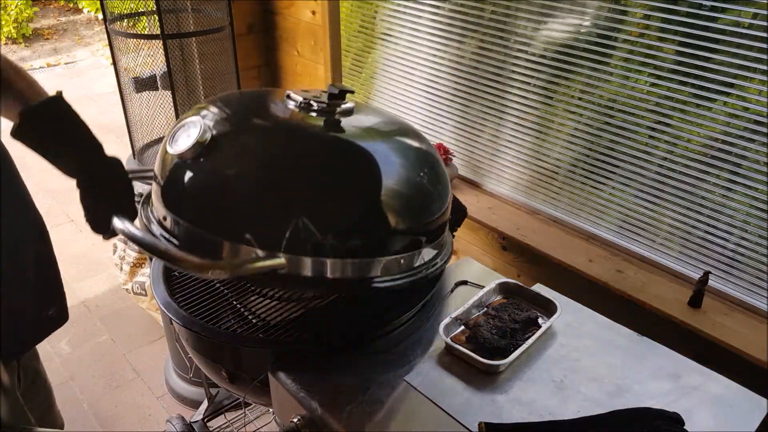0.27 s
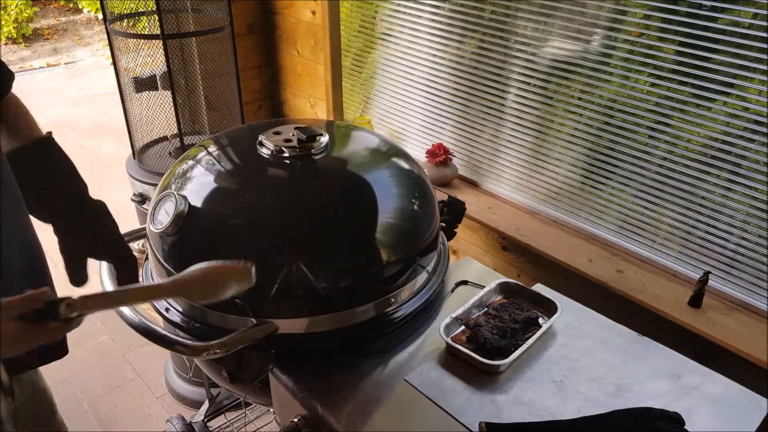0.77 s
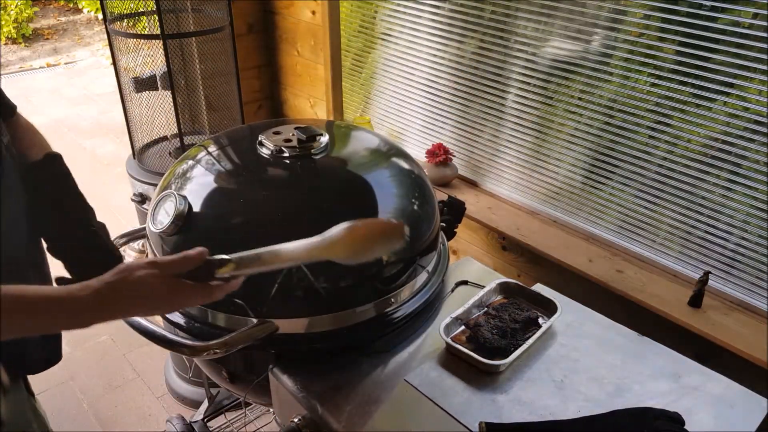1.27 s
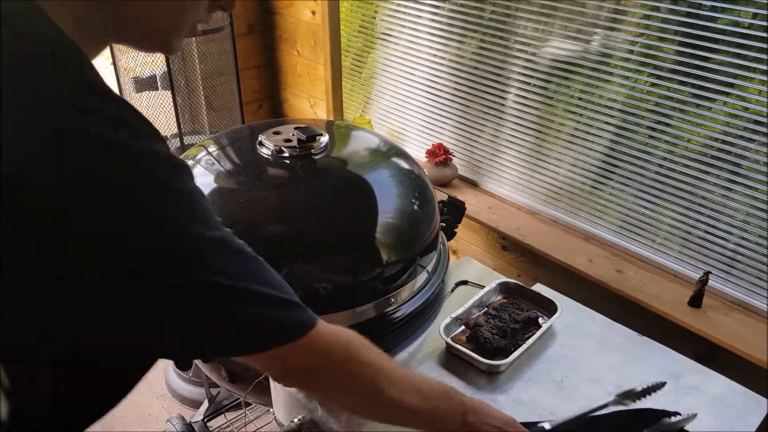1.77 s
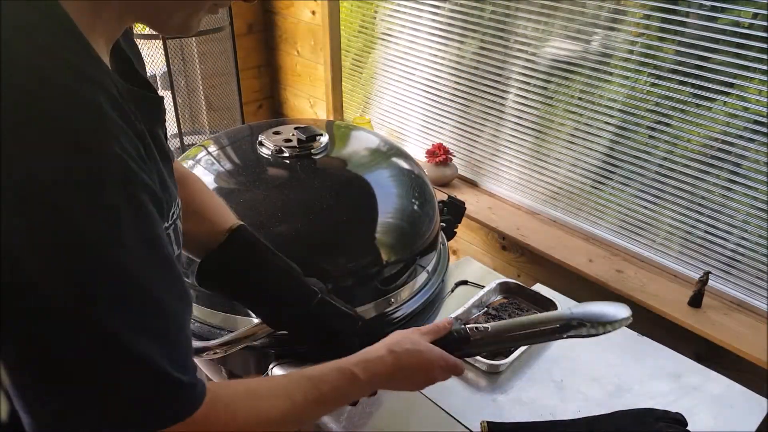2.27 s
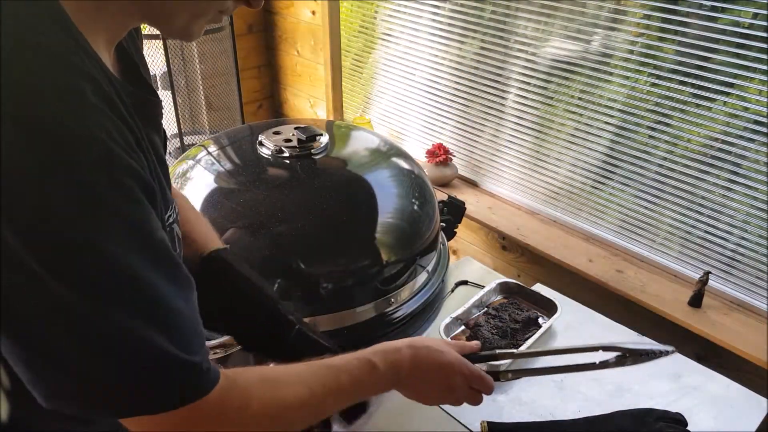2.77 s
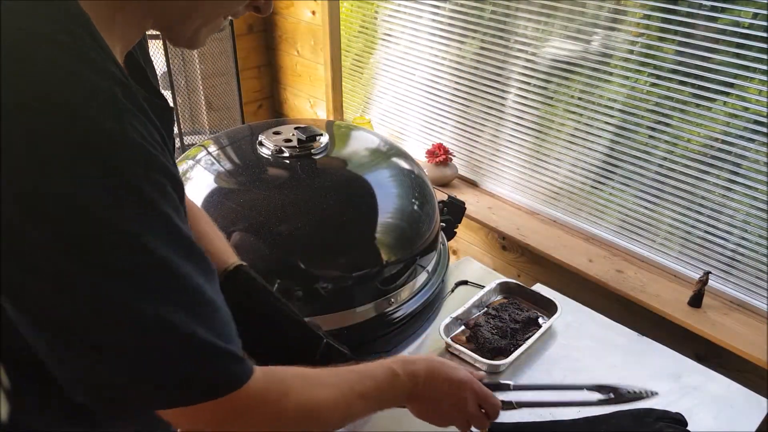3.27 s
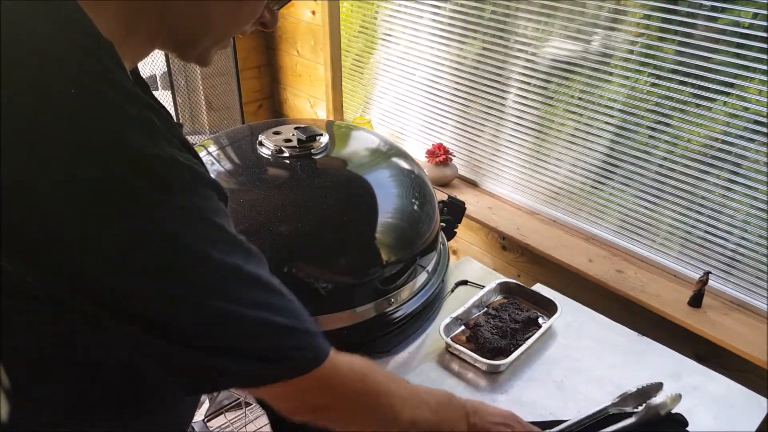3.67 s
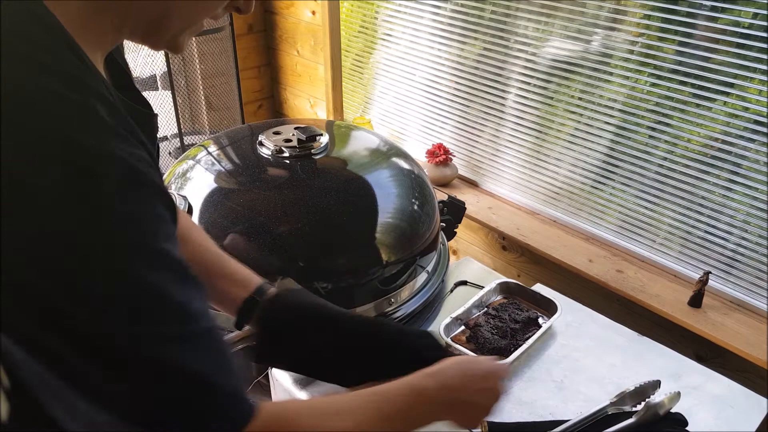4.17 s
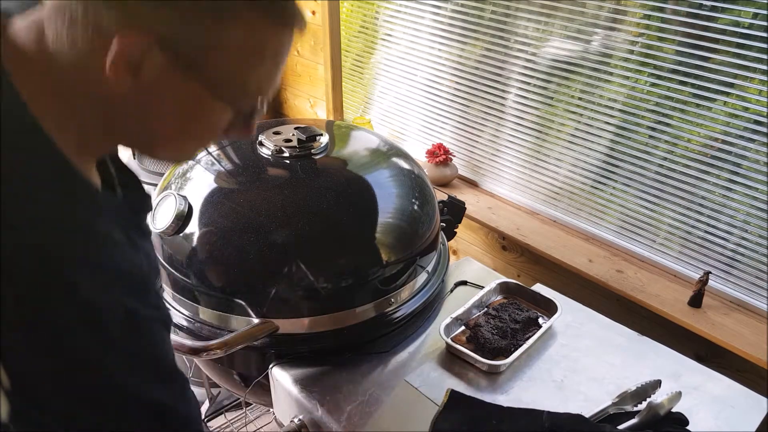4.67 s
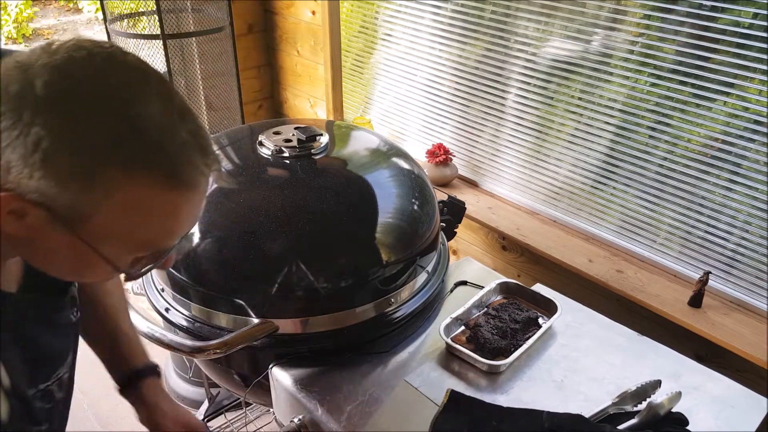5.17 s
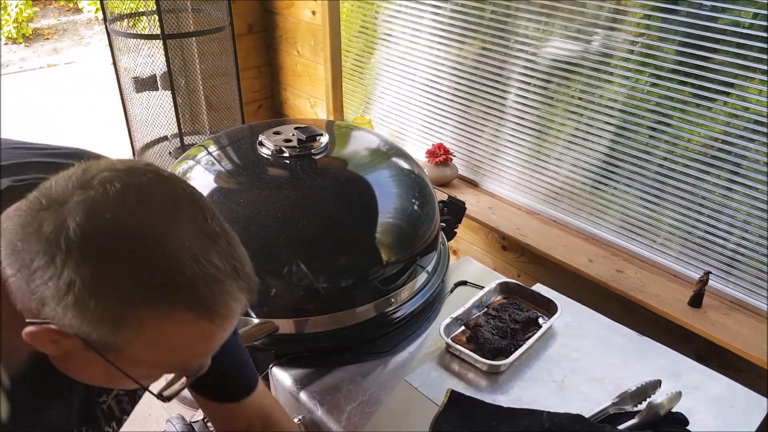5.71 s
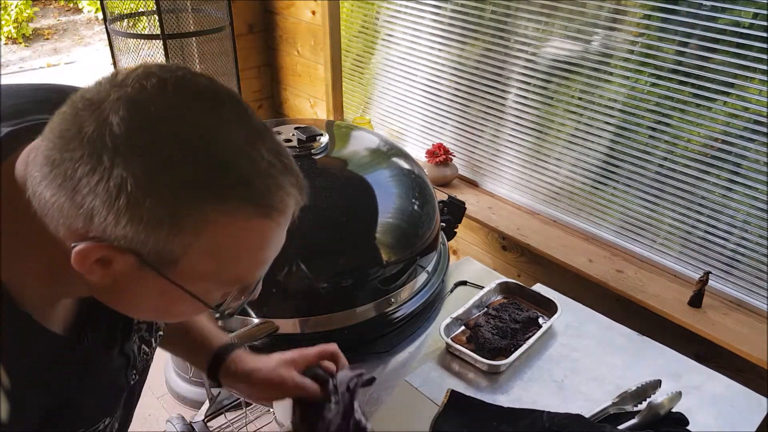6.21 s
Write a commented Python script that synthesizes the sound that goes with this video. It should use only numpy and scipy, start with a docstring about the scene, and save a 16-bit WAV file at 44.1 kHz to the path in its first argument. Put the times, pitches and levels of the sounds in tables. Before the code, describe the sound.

In a small wooden shelter, a steel lid's hinge gives a brief falling squeal with dry rubbing, then the lid seats softly with a short ring. Tongs click and chatter before being dropped with a loud, bright clack on a booming steel table. A glove lands softly, then gritty rummaging comes in bursts. Close stereo pickup, slightly right, with soft air and a faint distant bird.

```python
"""In a small wooden barbecue shelter a hinged steel kettle lid squeals down and seats on its bowl: stick-slip
overtones amid dry rubbing, a glove on the handle, a short ringing dome. Steel tongs chatter as tiny touches
through ringing arms and drop on the sheet-steel side table, whose modes boom; a glove is laid beside them.
Below the table, showers of small catches make gritty rummaging. Close walls answer nearly every sound; a far
bird whistles over soft air."""
import sys
import numpy as np
from scipy import signal
from scipy.fft import rfft, irfft, next_fast_len
from scipy.io import wavfile
from scipy.ndimage import map_coordinates

SR = 44100
rng = np.random.default_rng(int(sys.argv[2]) if len(sys.argv) > 2 else 0)


def materialize(psi):
    """Save the field psi as 16-bit PCM at rate SR to the path in sys.argv[1].

    A 1-D psi becomes a single channel; in a 2-D psi each row is a channel.
    """
    bounded = np.clip(np.atleast_2d(psi).T, -1, 1)
    quanta = np.round(bounded * 32767).astype(np.int16)
    wavfile.write(sys.argv[1], SR, quanta)


N = 284312

TOP_HZ = 16100  # upper band limit
T = np.arange(int(.7 * SR)) / SR  # time axis of one sound, in seconds


def amp(db):
    """Decibels to gain."""
    return 10 ** (np.asarray(db) / 20)


def unit(x):
    """Scale to rms 1."""
    return x / np.sqrt(np.mean(x ** 2) + 1e-20)


def burst(x, seconds):
    """Scale to the energy of rms 1 held for so many seconds."""
    energy = np.sum(np.atleast_2d(x) ** 2, 1).mean()
    return x / np.sqrt(energy / (seconds * SR) + 1e-20)


def along(points, hz):
    """Read a curve of (Hz, value) points on a log frequency axis."""
    f, v = np.transpose(points)
    return np.interp(np.log(hz + 1), np.log(f + 1), v)


def wobble(rate, size):
    """A smooth random curve with rate knots a second."""
    knots = rng.standard_normal(int(size * rate / SR) + 4)
    return map_coordinates(knots, [np.arange(size) * rate / SR])


def swell(t, middle, half):
    """A smooth rise and fall around a moment."""
    return np.cos(np.pi / 2 * np.clip((t - middle) / half, -1, 1))


def add(track, s, sound):
    """Mix a sound into the track at time s."""
    start = max(round(s * SR), 0)
    track[:, start:start + sound.shape[-1]] += sound[..., :N - start]


def colour(x, spectrum, modes=(), ring_db=0):
    """Causal filter: a broad spectrum with (Hz, width in Hz, dB) resonances standing out of it."""
    size = next_fast_len(x.shape[-1] // 2 + 2048) * 2
    hz = np.fft.rfftfreq(size, 1 / SR)
    peaks = sum(amp(db + ring_db) ** 2 / (1 + (2 * (hz - f) / width) ** 2) for f, width, db in modes)
    gain = amp(along(spectrum, hz)) * np.sqrt(1 + peaks)
    # folding the cepstrum forward gives minimum phase
    cepstrum = irfft(np.log(np.maximum(gain, 1e-6)))
    cepstrum[1:size // 2] *= 2
    cepstrum[size // 2 + 1:] = 0
    return irfft(rfft(x, size) * np.exp(rfft(cepstrum)), size)[..., :x.shape[-1]]


def diffuse(size):
    """Stereo noise from all around: alike in the bass, unrelated in the treble."""
    # Each row: frequency in Hz, left-right likeness from -1 to 1.
    likeness = [(60, 0.96), (125, 0.89), (250, 0.66), (500, 0.64), (1000, -0.19), (2000, 0.0077),
                (12000, 0.021)]
    z = rfft(rng.standard_normal((2, size)))
    turn = np.arccos(np.clip(along(likeness, np.fft.rfftfreq(size, 1 / SR)), -1, 1)) / 2
    mid, side = irfft(z * [np.cos(turn), np.sin(turn)], size)
    return np.array([mid + side, mid - side])


def shelter(x, direct_db, build_s=0.00045):
    """The direct sound, a little from the right, then the dense decaying answer of the close walls."""
    # Each row: frequency in Hz, time to die by 60 dB in seconds.
    wall_decay = [(100, 0.38), (500, 0.38), (2000, 0.25), (6000, 0.2), (15000, 0.13)]
    hz, t, z = signal.stft(diffuse(SR // 2), SR, nperseg=256)
    fade = amp(-60 * t / along(wall_decay, hz)[:, None])
    tail = signal.istft(z * fade, SR, nperseg=256)[1]
    tail *= 1 - np.exp(-T[:tail.shape[1]] / build_s)
    tail /= np.linalg.norm(tail[0])
    # the direct sound reaches the left a few samples late
    tail[[0, 1], [rng.integers(4, 13), 0]] += amp(direct_db)
    return signal.fftconvolve(x[None], tail, axes=1)[:, :len(x)]


def grains(rate, spread_db):
    """Tiny random contacts, about rate a second, a few much larger than the rest."""
    sizes = amp(spread_db * np.minimum(rng.exponential(size=len(T)), 4)) * rng.standard_normal(len(T))
    return unit(sizes * (rng.random(len(T)) < rate / SR))


def struck(modes, attack_s):
    """Decaying modes, each about 1 dB uneven from blow to blow, that take a moment to swell."""
    ring = 0
    for hz, db, t60 in modes:
        ring = ring + amp(db + rng.normal() - 60 * T / t60) * np.sin(2 * np.pi * hz * T)
    return ring * (1 - np.exp(-T / attack_s))


def background(rumble_db=-55, air_db=-63.0, drift_db=1):
    """A low uneven outdoor rumble under soft garden air, which swells with the cook's movements."""
    # Tone of the rumble, then of the air. Each row: frequency in Hz, relative level in dB per Hz.
    rumble_tone = [(15, -30), (32, -14), (44, -7.5), (53, 7), (64, -3), (80, -4), (105, -11), (160, -11.5),
                   (400, -96)]
    air_tone = [(20, -22), (100, -2), (200, -4.5), (400, -8), (800, -12.5), (1400, -17.5), (2100, -16.5),
                (2700, -15.5), (3300, -19), (4500, -17.5), (8000, -23), (15500, -22.5)]
    # Swells of the soft hiss. Each row: middle in seconds, half length in seconds, peak level in dB.
    swells = [(0, 0.53, -54.5), (1.906, 2.75, -64.5), (3.974, 0.59, -55.5), (6.144, 0.47, -57.5)]
    rumble = unit(colour(diffuse(N), rumble_tone)) * amp(rumble_db + 0.59 * wobble(5.54, N))
    stir = sum(amp(db) * swell(np.arange(N) / SR, s, half) for s, half, db in swells)
    air = unit(colour(diffuse(N), air_tone)) * np.hypot(amp(air_db), stir)
    return rumble + air * amp(drift_db * wobble(13, N))


def hinge(track, overtones_db=(-2, -3, -10, -12), jitter_hz=105, flutter_db=2.5):
    """The hinge sticks and slips at a sinking rate amid dry rubbing; later a glove rubs softly on the handle."""
    # The gliding squeal. Each row: time in seconds, pitch in Hz before jitter.
    glide = [(0.0, 6306), (0.072, 7533), (0.12, 6621), (0.19, 5930), (0.234, 4730), (0.246, 4312),
             (0.264, 4155), (0.312, 2657), (0.34, 2069)]
    # What the hinge's bracket radiates. Each row: frequency in Hz, gain in dB.
    bracket = [(1000, -10), (2200, 2.5), (3800, 3), (5200, -5), (6500, 2), (8200, -4.5), (10000, 2),
               (12500, 4), (16000, -6)]
    # Two dry rubs of the hinge, then the glove on the handle.
    # Each row: middle in seconds, half length in seconds, peak level in dB.
    rubs = [(.066, 0.039, -49), (0.338, 0.11, -51.5), (0.63, 0.17, -57)]
    squeal_db, hold_s, fade_db_per_s = -46.5, .25, 148  # holds, then dies as the lid slows
    pitch = np.interp(T, *np.transpose(glide)) + jitter_hz * wobble(1100, len(T))
    phase = 2 * np.pi * np.cumsum(pitch) / SR
    squeal = 0
    for k, db in enumerate(overtones_db, 1):
        squeal = squeal + amp(db) * np.sin(k * phase) * (k * pitch < TOP_HZ)
    level = squeal_db - fade_db_per_s * np.maximum(T - hold_s, 0)
    squeal = colour(squeal, bracket) * amp(level + flutter_db * wobble(119.5, len(T)))
    rub_tone = [(100, -32), (350, 10), (700, -4), (1200, 0), (2300, 7), (4000, 6),
                (7000, 2), (12000, 9), (16000, 10.5)]  # (Hz, relative dB)
    rub = unit(colour(grains(5000, 3.4), rub_tone))
    rub *= sum(amp(db) * swell(T, s, half) for s, half, db in rubs)
    add(track, 0, shelter(squeal, direct_db=3))
    add(track, 0, shelter(rub, direct_db=2.5))


def bird(track):
    """Thin falling whistles of a far bird: gliding sines, their pitch blurred by a fast wobble."""
    # Each row: start in seconds, length in seconds, from Hz, to Hz, level in dB before the walls.
    whistles = [(.07, 0.11, 4850, 4100, -59), (0.531, 0.17, 4800, 4025, -58),
                (5.748, 0.088, 4940, 3780, -61)]
    for s, length, from_hz, to_hz, db in whistles:
        pitch = np.interp(T, [0, length], [from_hz, to_hz]) * (1 + .028 * wobble(1100, len(T)))
        arch = np.sin(np.pi * np.minimum(T / length, 1))
        whistle = np.sin(2 * np.pi * np.cumsum(pitch) / SR) * arch
        add(track, s, amp(db) * shelter(whistle, direct_db=-3))


def contacts(track, tick_db=-5, clack_db=-3, sheen_db=7):
    """Steel meets steel: one firm clack, and a brief bright chatter that rings the arms of the tongs."""
    # Contacts of lid rim and tongs. Each row: start in seconds, strength in dB, clack in dB before its trim.
    touches_of_steel = [(.6973, -29, -44.5), (.9715, -34, -52), (.991, -27.5, -47), (1.1034, -46.5, -42),
                        (1.1403, -31, -45), (1.214, -50, -74), (1.3573, -24, -45), (1.5571, -41.5, -83),
                        (1.6113, -40.5, -81), (1.8236, -15.5, -42.5), (1.8309, -25, -36.5),
                        (1.8915, -21, -64), (2.0279, -42, -63), (2.1107, -43, -78), (2.1767, -39.5, -69),
                        (2.199, -43, -74), (2.3278, -50, -46.5), (2.3733, -25, -34), (2.4892, -41.5, -45.5),
                        (2.6056, -30.5, -45.5), (2.7272, -47.5, -57), (2.801, -53, -59),
                        (2.9919, -34.5, -49), (3.0184, -33, -42.5), (3.2637, -47.5, -41),
                        (3.3389, -41.5, -42.5), (3.4596, -32, -45.5), (3.5658, -39.5, -74),
                        (3.6088, -23.5, -50.5), (3.6451, -35, -36), (3.6911, -13, -23.5),
                        (3.7061, -16, -29), (3.721, -19, -26), (3.7822, -25.5, -52), (3.8215, -27, -38)]
    # Tones of the tick, ring, clack and hard top sheen. Each row: frequency in Hz, relative level in dB per Hz.
    tick_tone = [(5000, -43), (8500, -11), (10500, -3.5), (11100, 1), (12000, 0.5), (15100, 0.5),
                 (16000, -16.5)]
    ring_tone = [(1120, -51), (1900, -9), (3210, -7), (3930, -4.5), (4230, -6), (4530, -3), (6830, -3),
                 (8250, -7.5), (9500, -9), (12400, -14.5), (20900, -120)]
    clack_tone = [(120, -26.5), (300, 1), (560, -3), (760, 0.5), (1100, -2), (1450, -0.5), (2000, 2),
                  (2700, -5.5), (4000, -15.5), (9000, -19)]
    sheen_tone = [(9000, -40), (12500, 1), (14500, 9), (16000, -3)]
    # Resonances of the tongs' arms. Each row: frequency in Hz, width in Hz, height in dB before ring_db.
    arms = [(773, 45, 1), (1120, 17, 6), (1650, 40, -15.5), (2480, 63, 4.5), (2560, 50, -17),
            (3490, 100, -2.5), (5180, 140, -1.5), (5950, 165, -3), (9300, 180, -6.5), (12600, 430, 3.5),
            (12400, 260, -15), (14200, 220, -2)]
    ring_at_full_db, ring_grows = -16, 0.83  # dB at full strength, dB per dB of strength
    rise_s, chatter_s = 0.0008, 0.0064  # the chatter builds up, then dies
    settle_db, settle_s = -19.5, 0.049  # the loose arms settle more slowly
    impulse = signal.unit_impulse(len(T) // 8)
    tick, ring, clack, sheen = [burst(colour(impulse, tone, arms, ring_db=1.0), 0.019)
                                for tone in (tick_tone, ring_tone, clack_tone, sheen_tone)]
    blow = np.pad(clack, (0, len(T) - len(clack)))

    def chatter(db):
        """A quick run of tiny touches that swells and fades."""
        fade = np.exp(-T / chatter_s) + amp(settle_db) * np.exp(-T / settle_s)
        touches = grains(4000, 3.1) * (1 - np.exp(-T / rise_s)) * fade
        steel = amp(db + tick_db) * tick + amp(ring_at_full_db + ring_grows * db) * ring
        steel += amp(2 * db + sheen_db) * sheen  # harder contacts are shorter, so brighter
        sound = signal.fftconvolve(touches / np.linalg.norm(touches), steel)[:len(T)]
        return shelter(sound, direct_db=-6.5, build_s=.0008)

    for s, db, clack_level in touches_of_steel:
        firm = amp(clack_level + clack_db) * shelter(blow, direct_db=-5.5)
        add(track, s, chatter(db) + firm)
    # the loose arms of the tongs touch at random while they are swung
    start, end = 1.42, 1.8  # seconds
    jingles_per_s, jingle_db = 5.9, -44.5  # the softest strength; up to 5 dB harder
    for place, size in rng.random((int(jingles_per_s * (end - start)), 2)):
        add(track, start + place * (end - start), chatter(jingle_db + 5 * size))


def scrapes(track, stroke_db=-4.5, fade_db=7, judder_db=0.8):
    """Each stroke is a shower of small catches that swells, eases and stops, heard through a hollow body."""
    # Smooth slides of lid rim, tongs and glove. Each row: start in seconds, length in seconds,
    # pressure in dB before stroke_db.
    slides = [(0.7, 0.083, -45.5), (1.01, 0.12, -52), (1.839, 0.069, -38.5), (2.401, 0.12, -53.5),
              (3.696, 0.066, -26.5), (3.762, 0.084, -42), (4.382, 0.075, -42.5)]
    # Gritty scrapes of the glove and of rummaging, with the same columns as the slides.
    rummaging = [(4.499, 0.046, -44.5), (4.847, 0.009, -46.5), (4.905, 0.17, -37), (5.014, 0.041, -30),
                 (5.075, 0.13, -39.5), (5.221, 0.066, -38), (5.308, 0.079, -30.5), (5.41, 0.39, -51),
                 (5.551, 0.072, -37.5), (5.639, 0.16, -60.5), (6.074, 0.016, -52.5), (6.19, 0.082, -35.5),
                 (6.263, 0.044, -25), (6.298, 0.2, -31), (6.375, 0.059, -22.5)]
    # Tones of the grit and of the body. Each row: frequency in Hz, relative level in dB per Hz.
    grit_tone = [(1200, -28.5), (2500, -3), (3600, 1), (5000, -1.5), (7000, -2), (11000, -0.5), (13000, 0),
                 (15800, -7)]
    body_tone = [(65, -35), (110, -10), (232, -4.5), (380, -4), (451, -3.5), (512, -4), (738, -0.5),
                 (1130, -3), (1490, -7), (1630, -7.5), (2010, -4), (3200, -12), (4160, -17), (7040, -120)]
    # Resonances of the hollow body. Each row: frequency in Hz, width in Hz, height in dB before ring_db.
    hollow = [(255, 82, -2), (464, 7.4, -2), (604, 51, -3.5), (663, 6.9, 2.5), (734, 25, -2.5),
              (1260, 18, -3), (1520, 115, 1), (1523, 27, -13), (2650, 40, -32), (2820, 13, -13),
              (6340, 100, -3.5), (9800, 37, -16)]
    slide_grit_db = -6  # a slide is mostly body, with little grit
    grit_db, grit_grows = 19, 1.456  # harder is grittier: dB at full pressure, dB per dB of pressure
    rise_s, stop_s = 0.0063, 0.026  # every stroke starts and stops alike
    impulse = signal.unit_impulse(len(T) // 8)
    grit, body = [colour(impulse, tone, hollow, ring_db=6) for tone in (grit_tone, body_tone)]
    strokes = [(s, length, db, db + slide_grit_db) for s, length, db in slides]
    strokes += [(s, length, db, grit_db + grit_grows * db) for s, length, db in rummaging]
    for s, length, body_level, grit_level in strokes:
        force = np.interp(T, [0, rise_s, length, length + stop_s], [0, 1, amp(-fade_db), 0])
        surface = amp(grit_level) * burst(grit, length) + amp(body_level) * burst(body, length)
        catches = force * amp(judder_db * wobble(109, len(T))) * grains(5000, 2.17)
        sound = signal.fftconvolve(catches / np.linalg.norm(catches), surface)[:len(T)]
        add(track, s, amp(stroke_db) * shelter(sound, direct_db=-7.5))


def booms(track, floor_db=0, cart_db=-2, drum_db=-3, panel_db=-5):
    """Heavy contacts thud into the floor, rock the cart and flex the table top."""
    # Each row: start in seconds, floor thud in dB, cart boom in dB, both before their trims.
    heavy_contacts = [(0.708, -36, -44), (0.938, -43.5, -51), (1.848, -51, -39.5), (1.918, -50, -40),
                      (2.039, -55, -42.5), (3.714, -38, -18), (3.791, -46, -28), (4.442, -43, -43),
                      (4.802, -75, -42.5), (5.05, -44, -41), (5.37, -43, -39), (6.28, -52, -37),
                      (6.384, -54, -37.5)]
    # Modes of floor, cart, the table top's main flexing and its upper panel ring.
    # Each row: frequency in Hz, relative level in dB, time to die by 60 dB in seconds.
    floor_modes = [(56, 3.5, 0.31), (38, -13, 0.12)]
    cart_modes = [(79.9, 9.5, 0.31), (93, -5, 0.49)]
    drum_modes = [(233.5, 0, 0.33)]
    panel_modes = [(191.2, -13, 0.43), (298, 3, 0.1), (344.4, -2.5, 0.32), (365.4, -5, 0.29),
                   (416, -7, 0.235), (444, -0.5, 0.14), (584, -24, 0.56), (610, -30, 0.2), (790, -12, 0.31),
                   (800, -10, 0.29), (1078, -20, 0.37)]
    flex_db, flex_grows = 6, 1.584  # out of proportion: dB at full boom, dB per dB of boom
    for s, thud_level, boom_level in heavy_contacts:
        thud = burst(struck(floor_modes, attack_s=0.026), 0.032)
        cart = burst(struck(cart_modes, attack_s=0.019), 0.024)
        drum = burst(struck(drum_modes, attack_s=0.013), 0.033)
        panel = burst(shelter(struck(panel_modes, attack_s=0.0043), direct_db=1.0), 0.039)
        add(track, s, amp(thud_level + floor_db) * thud + amp(boom_level + cart_db) * cart)
        flex = amp(flex_db + flex_grows * boom_level)
        add(track, s, flex * (amp(drum_db) * drum + amp(panel_db) * panel))


def lid(track):
    """The steel dome drops the last bit onto its bowl and rings briefly in its modes."""
    # Each row: frequency in Hz, relative level in dB, time to die by 60 dB in seconds.
    dome = [(486, -4.5, 0.081), (520, -6, 0.082), (2170, -3, 0.12), (2440, -6, 0.11)]
    seat_s, seat_db = .779, -45
    ring = shelter(struck(dome, attack_s=.002), direct_db=-7)
    add(track, seat_s, amp(seat_db) * burst(ring, 0.027))


def knocks(track, knock_db=-4):
    """Damped contacts give only a few cycles: the higher their pitch, the sharper the crack."""
    # Knocks of lid, handle, tongs and glove. Each row: start in seconds, level in dB before knock_db,
    # pitch in Hz.
    damped_contacts = [(.925, -45.5, 385), (1.066, -47, 456), (1.124, -42, 590), (2.3731, -33, 1220),
                       (3.016, -42, 1450), (3.095, -46, 1070), (3.11, -46.5, 370), (3.264, -43, 764),
                       (3.338, -37.5, 777), (3.634, -42, 323), (3.748, -29, 1870), (4.389, -42, 900),
                       (4.802, -47.5, 240), (5.937, -45.5, 265)]
    decay_cycles = 1.9  # cycles to fall to 1/e
    for s, db, hz in damped_contacts:
        knock = np.sin(2 * np.pi * hz * T) * np.exp(-T * hz / decay_cycles)
        add(track, s, amp(db + knock_db) * burst(shelter(knock, direct_db=-0.5), 0.025))


def scene():
    """All sources in one shelter, over the background."""
    track = background()
    for source in (hinge, bird, contacts, scrapes, booms, lid, knocks):
        source(track)
    return track


def record(dry):
    """The right microphone hears more, by a frequency-dependent tilt; nothing passes the band limit."""
    # Each row: frequency in Hz, left minus right in dB.
    lean = [(60, -2.5), (2000, -1.24), (8000, -2), (13000, -3)]
    size = next_fast_len(N + SR // 2)
    hz = np.fft.rfftfreq(size, 1 / SR)
    sides = amp(np.outer([.5, -.5], along(lean, hz)))
    band = np.clip((TOP_HZ - hz) / 200 + .5, 0, 1)
    return irfft(rfft(dry, size) * sides * band, size)[:, :N]


dry = scene()
out = record(dry)
materialize(out)
```